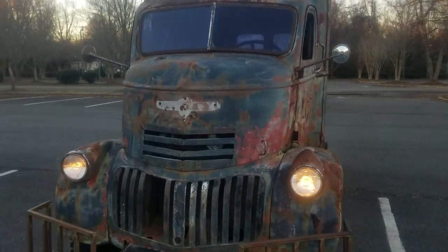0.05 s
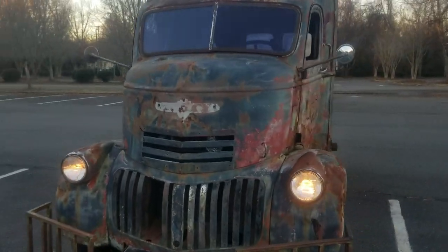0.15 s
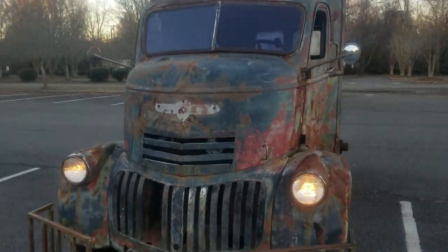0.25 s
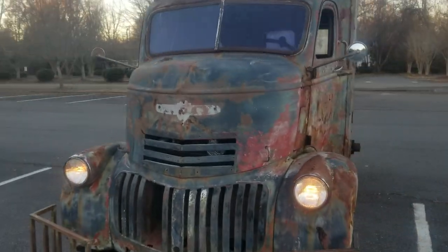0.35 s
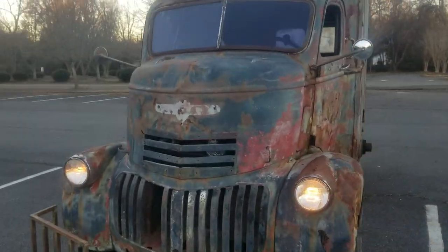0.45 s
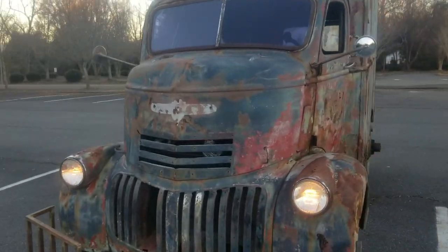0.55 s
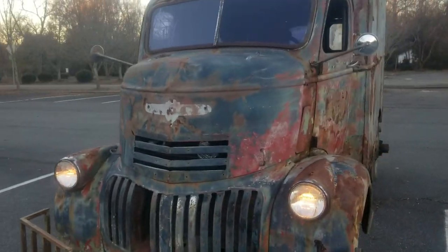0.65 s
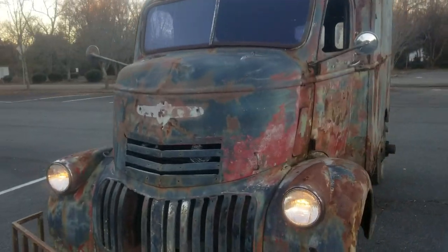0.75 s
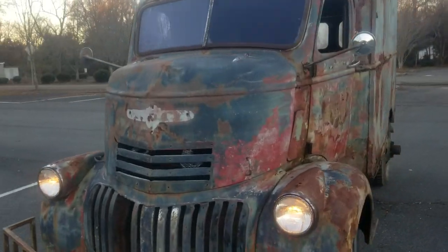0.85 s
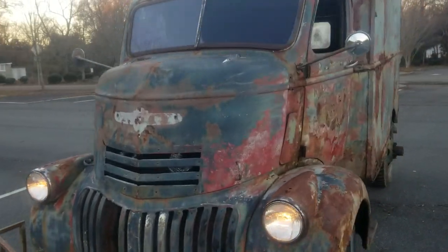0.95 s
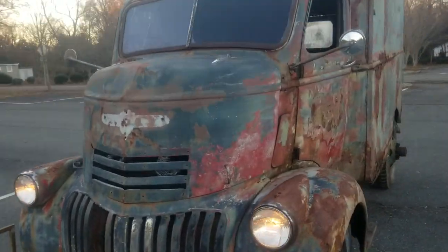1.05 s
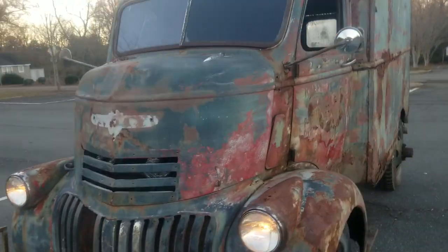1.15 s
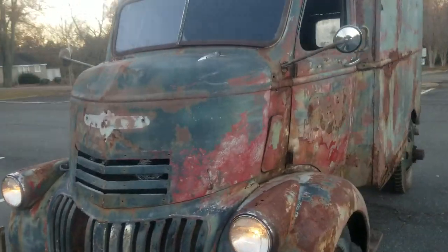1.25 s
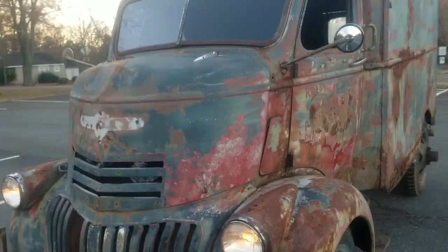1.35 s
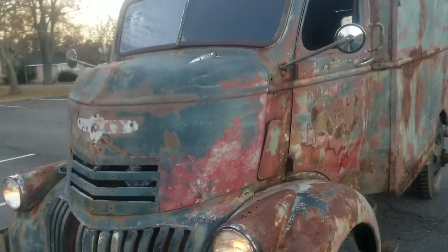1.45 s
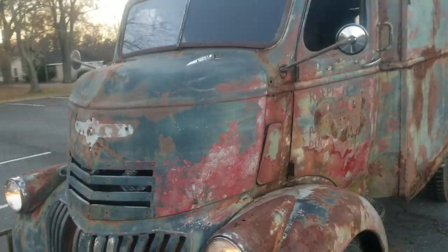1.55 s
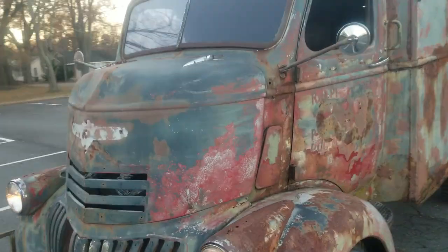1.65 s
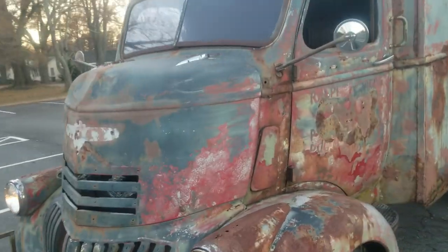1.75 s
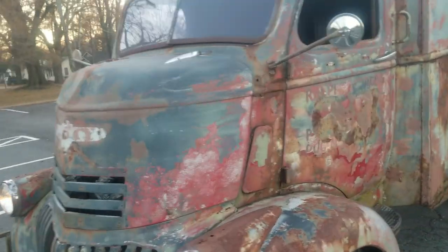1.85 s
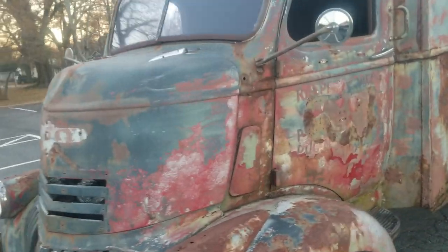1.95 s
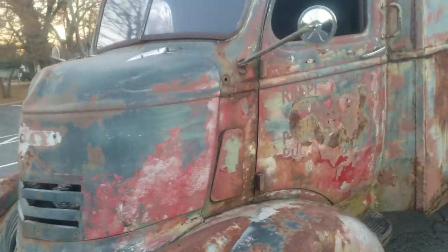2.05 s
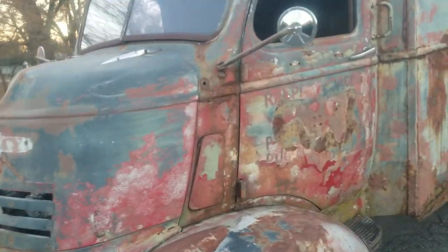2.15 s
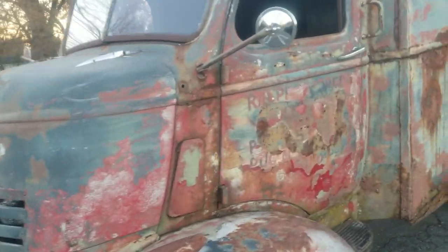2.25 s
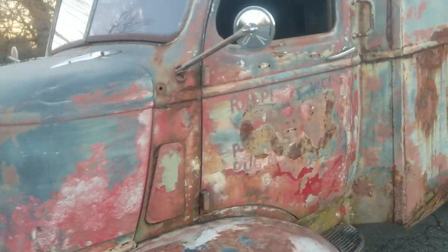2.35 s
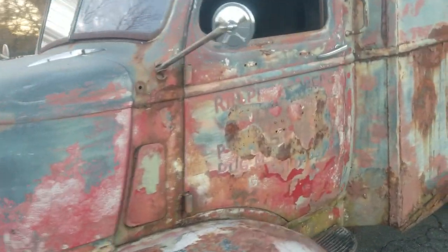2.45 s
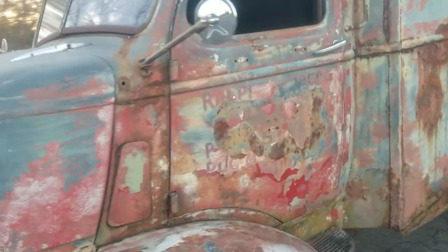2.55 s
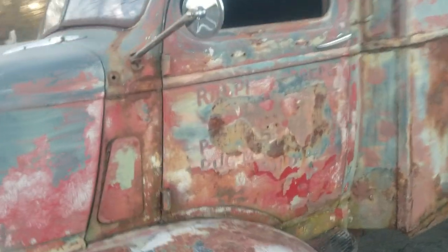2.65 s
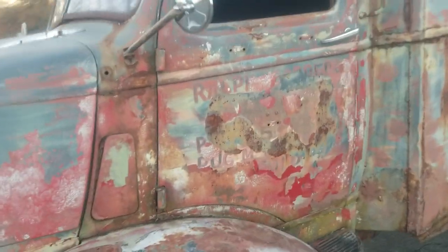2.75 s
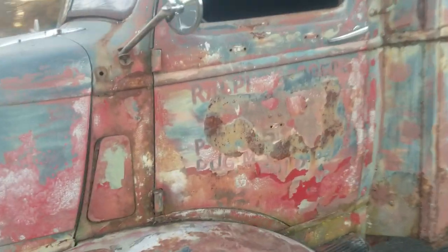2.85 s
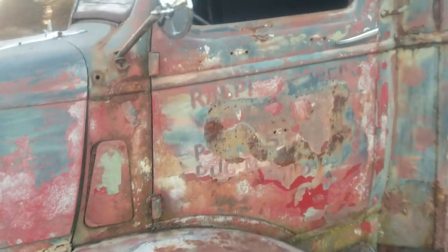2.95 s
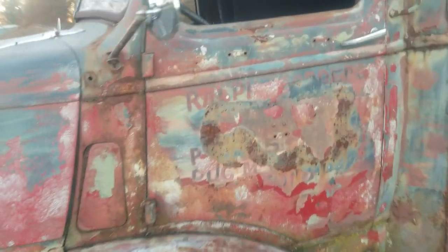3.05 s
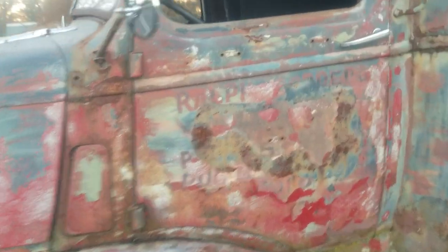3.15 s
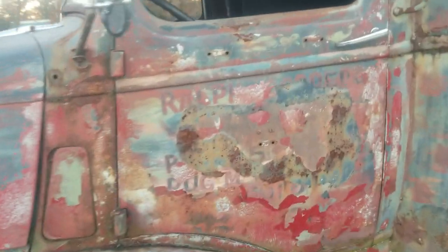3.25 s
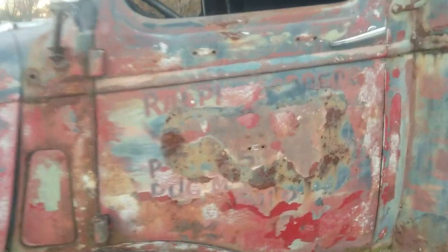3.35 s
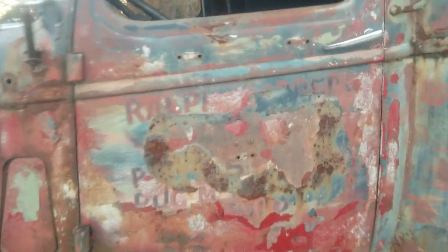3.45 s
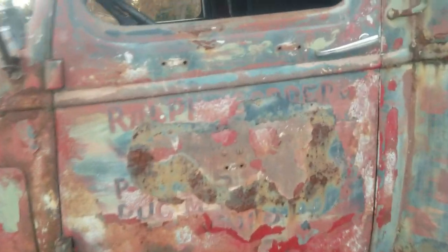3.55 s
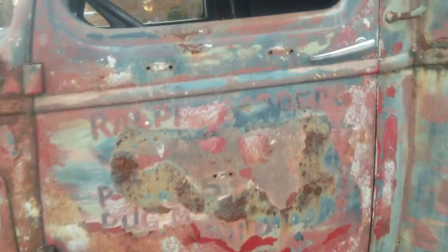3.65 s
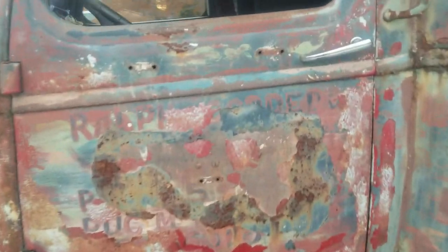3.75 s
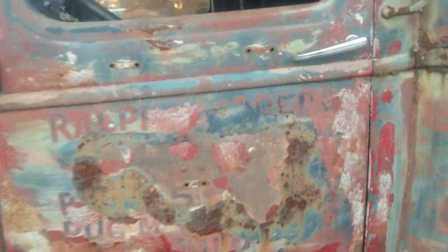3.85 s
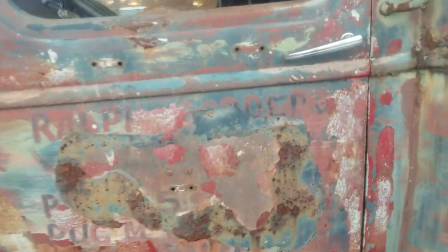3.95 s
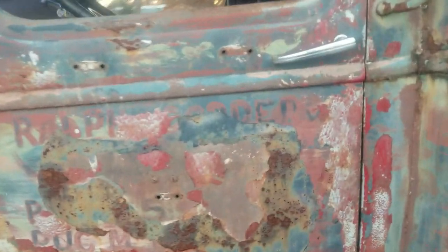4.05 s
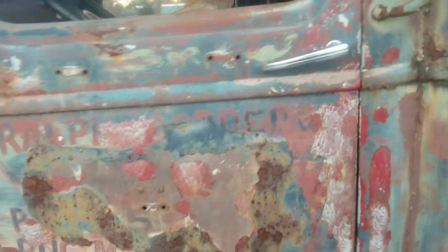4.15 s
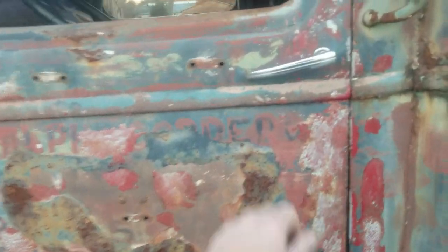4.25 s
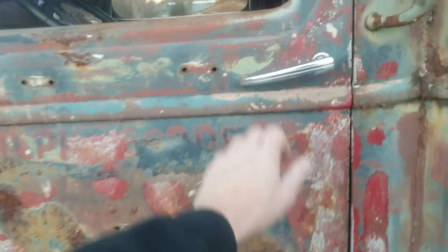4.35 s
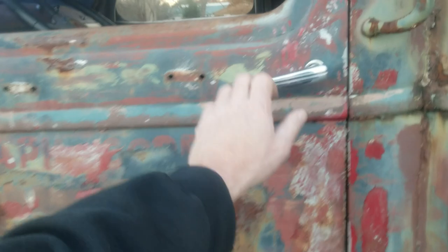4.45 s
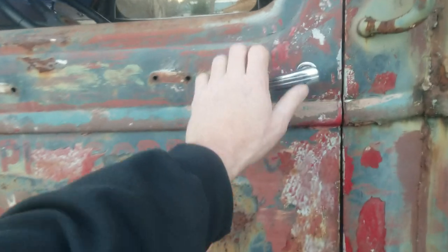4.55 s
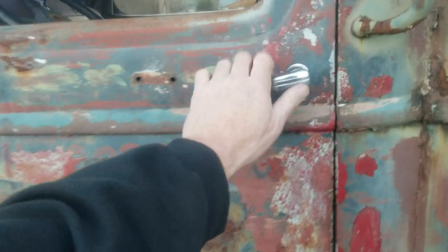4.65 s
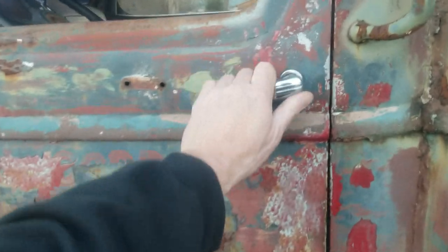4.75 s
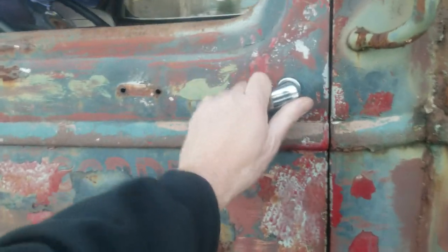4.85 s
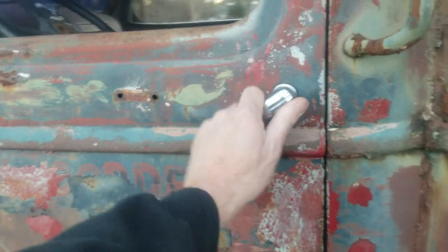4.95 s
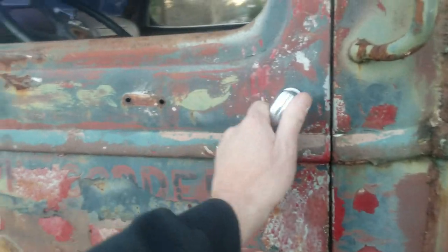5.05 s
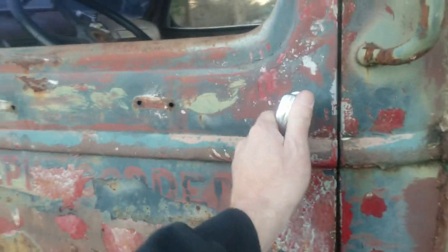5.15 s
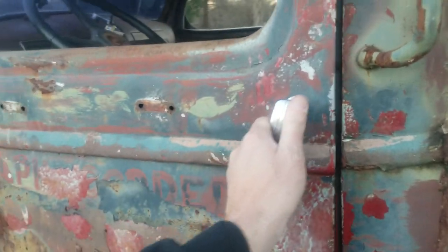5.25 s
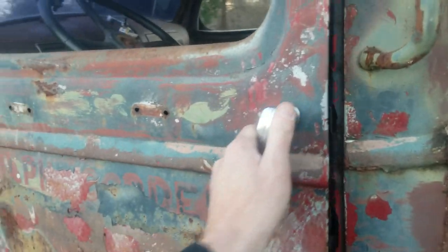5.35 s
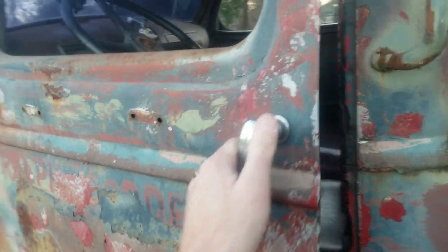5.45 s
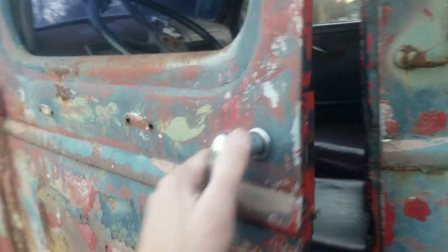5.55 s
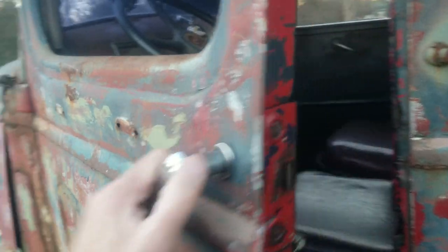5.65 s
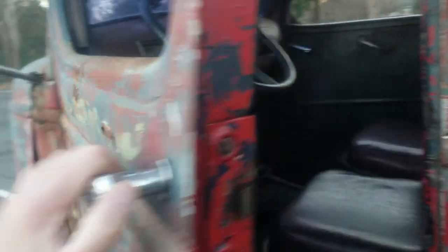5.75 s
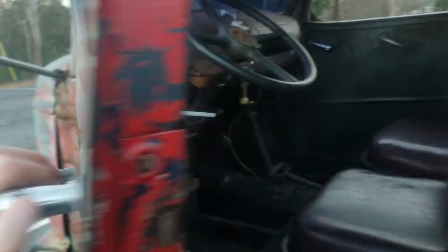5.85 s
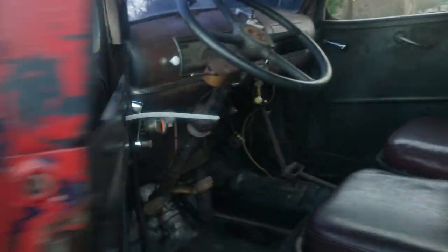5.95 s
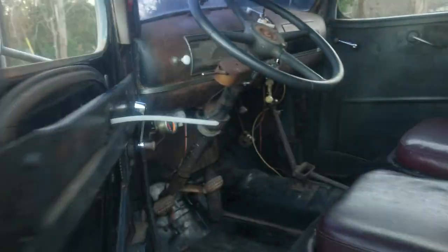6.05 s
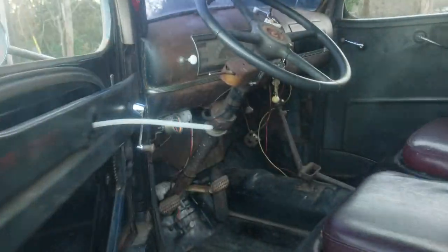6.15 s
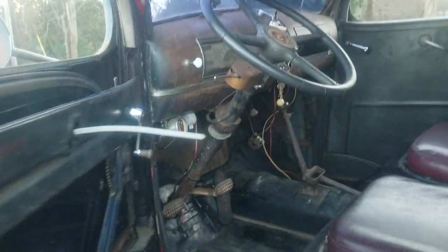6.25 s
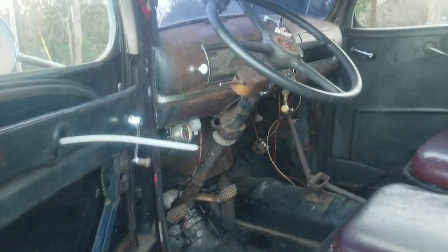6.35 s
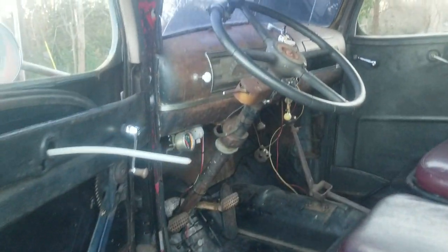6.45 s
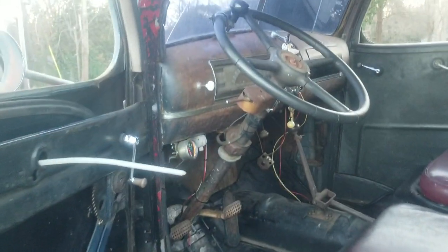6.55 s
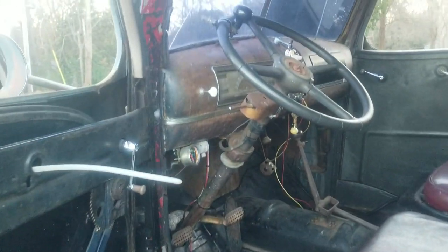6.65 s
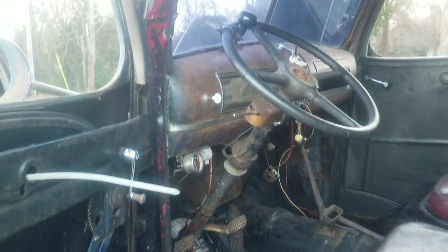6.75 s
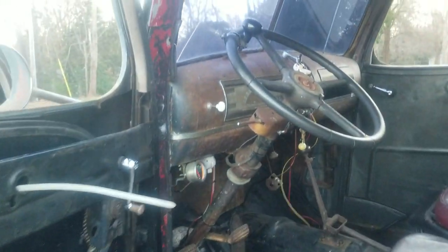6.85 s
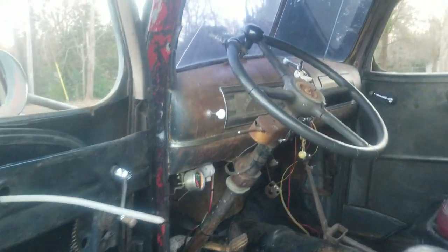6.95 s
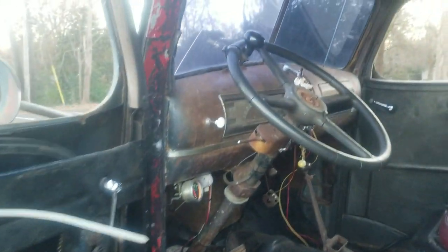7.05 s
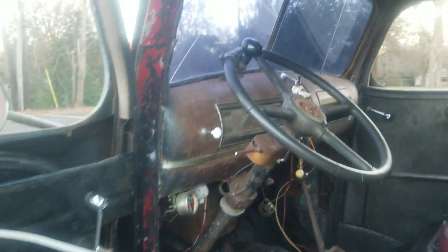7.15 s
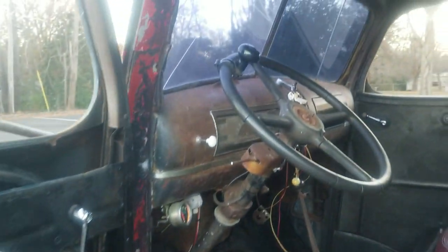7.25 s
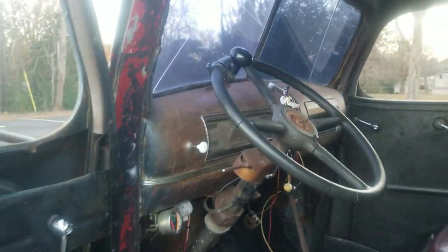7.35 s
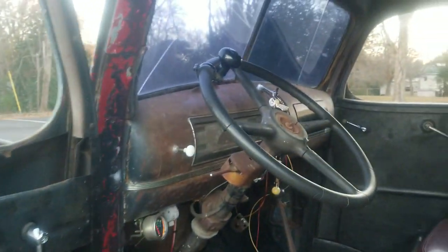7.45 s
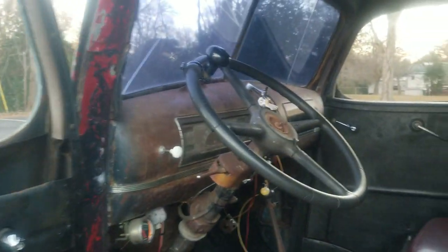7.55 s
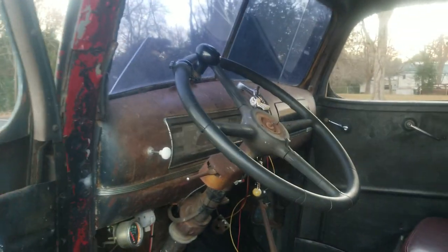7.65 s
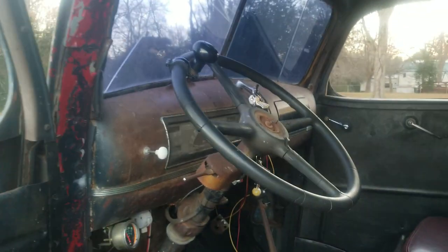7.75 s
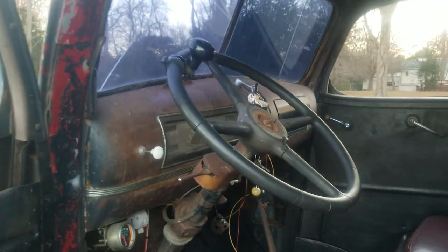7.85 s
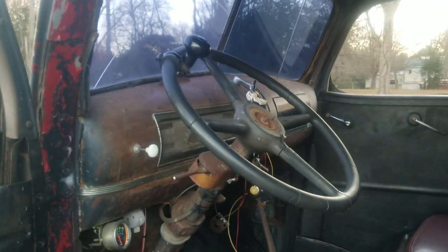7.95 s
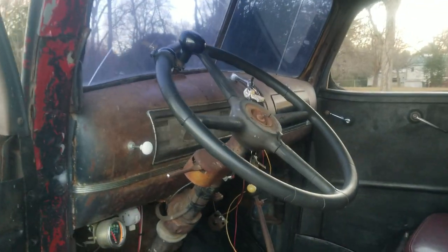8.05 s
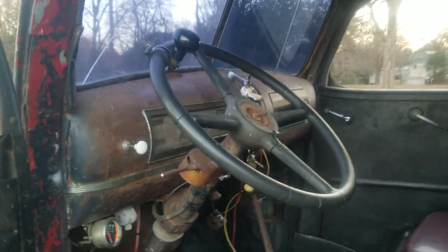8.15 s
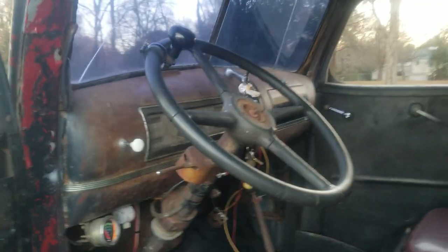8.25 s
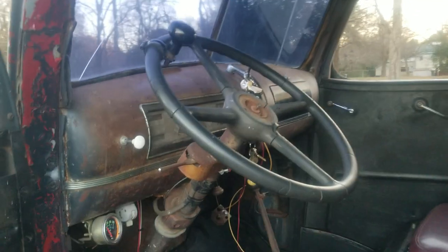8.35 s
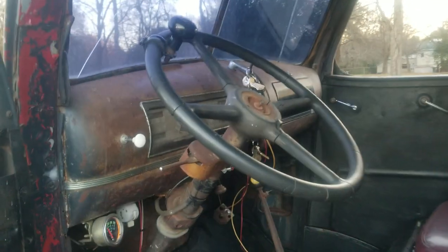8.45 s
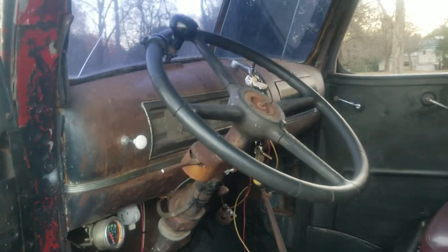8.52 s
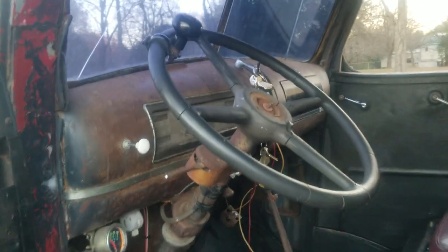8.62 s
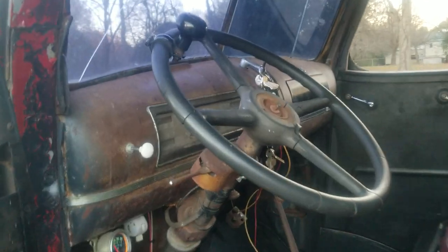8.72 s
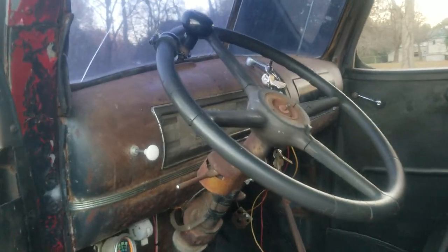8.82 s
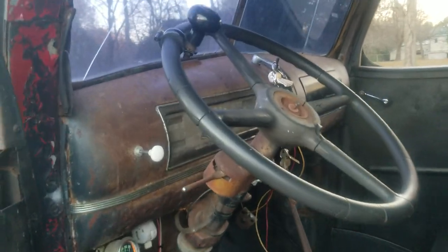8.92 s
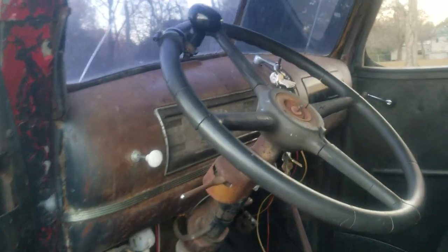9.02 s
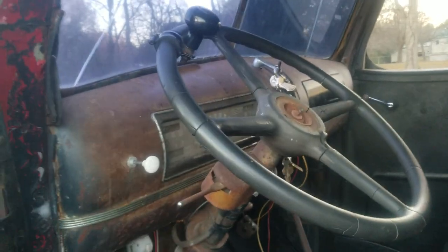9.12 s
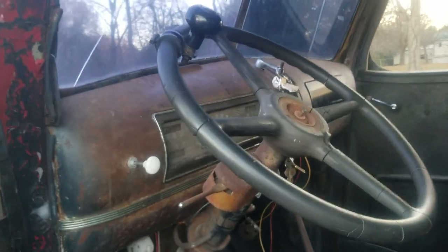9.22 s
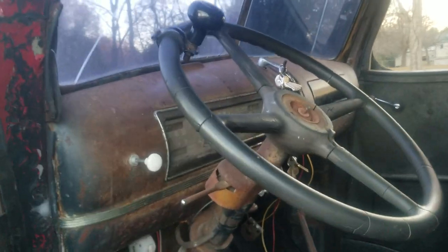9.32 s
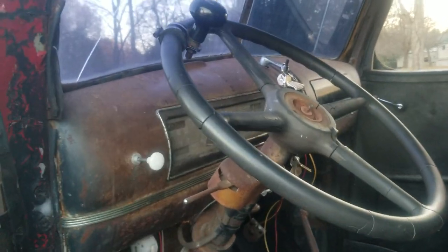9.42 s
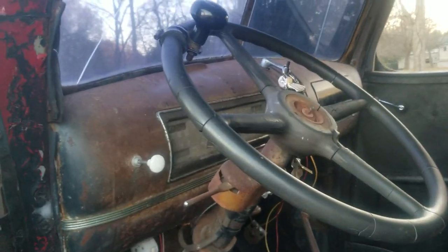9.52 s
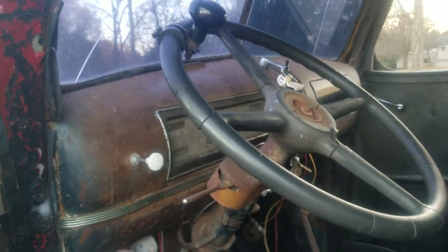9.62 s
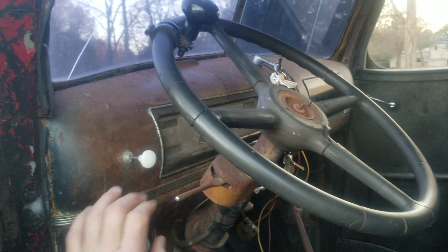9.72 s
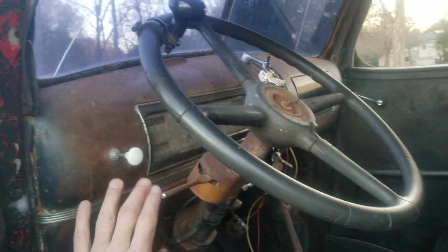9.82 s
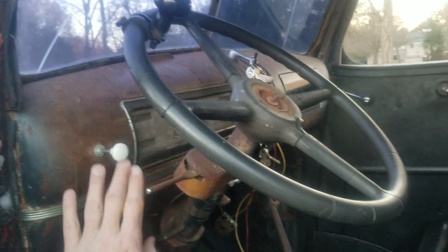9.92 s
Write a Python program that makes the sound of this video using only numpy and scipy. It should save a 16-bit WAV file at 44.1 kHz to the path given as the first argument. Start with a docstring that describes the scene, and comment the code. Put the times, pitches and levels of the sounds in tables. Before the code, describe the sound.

An old truck's handle clacks and squeaks, the steel door unlatches and swings open, over jacket swishes and a nearby engine.

```python
"""A nylon jacket swishes and shoes touch gritty asphalt in an open car park, over a traffic rumble and an
engine that pulls through two gears, then coasts. The handle of an old truck clacks and squeaks by
stick-slip friction, the latch grinds and lets go, and the steel door booms free and swings open. Loose
fittings clack, and gritty knocks follow as someone leans into the cab. Each impact is a burst of dense
ringing together with the damped normal modes of the struck body."""
import sys
import numpy as np
from scipy import signal
from scipy.fft import rfft, irfft, next_fast_len
from scipy.io import wavfile
from scipy.ndimage import uniform_filter1d

SR = 44100
rng = np.random.default_rng(int(sys.argv[2]) if len(sys.argv) > 2 else 0)


def materialize(psi):
    """Save the field psi as 16-bit PCM at rate SR to the path in sys.argv[1].

    A 1-D psi becomes a single channel; in a 2-D psi each row is a channel.
    """
    bounded = np.clip(np.atleast_2d(psi).T, -1, 1)
    quanta = np.round(bounded * 32767).astype(np.int16)
    wavfile.write(sys.argv[1], SR, quanta)


N = 440118

# Impacts: start_s, strength_db, thud_db, tick_db (the last two relative to the strength)
DOOR_BLOWS = [(4.9338, -19, -5.5, -23), (4.9408, -33, -1, -12.5), (4.961, -34.5, 9, -16),
              (5.118, -30, 0, -17), (5.1233, -41, 11, 3.5), (5.784, -24.5, -9, -19)]
LATCH_BLOWS = [(5.2514, -24, 9, -24), (5.2684, -21, 3.5, -19), (5.2823, -22.5, -6, -23),
               (5.3167, -29.5, -21, -27), (5.3555, -33.5, -1, -27)]
CAB_KNOCKS = [(8.9425, -37.5, -0.5, -16), (9.0157, -22.5, -15.5, -2.5), (9.0854, -35.5, 0, -27),
              (9.3775, -29.5, -36, -2), (9.7394, -27.5, -7.5, -29)]
STEPS = [(.805, -47, -10, -10), (2.5205, -48.5, 23, -10), (2.592, -59, 16, -13), (3.093, -63, 8, -1)]
# Impacts on small parts: start_s, strength_db, thud_db, tick_db, ring_on_db
HANDLE_BLOWS = [(4.389, -32.5, -15, -21, 22), (4.4256, -19.5, -20, -26, -31), (4.4334, -21, -16, -16, -28),
                (5.0605, -26.5, -10, -25, 4), (5.066, -28.5, -11, -27, 8)]
FITTING_BLOWS = [(6.647, -45, -15, -8, -16), (8.561, -53, -2, -19, -4), (8.592, -54, 8, -10, -11),
                 (8.6185, -32.5, -4, -19, -8), (8.6418, -44.5, 3, -15, -9), (8.692, -46, -1, -17, -15),
                 (8.7575, -55, -1, -15, -6)]
STOP_BLOWS = [(7.9188, -18, -15, -20, -2)]
# Normal modes of each struck body: pitch_hz, level_db, t60_s
DOOR_MODES = [(78.4, -18, 0.27), (115.3, -1, 0.7), (156, 8.5, 0.31), (207.4, -2, 0.57), (276.5, -5, 0.45),
              (353, -6, 0.45), (725, 7, 0.25), (830, 1, 0.2), (1119, 5, 0.33), (1152, 1, 0.2),
              (1390, -2, 0.17), (1575, 1, 0.19), (1803, 2, 0.12), (1945, 2, 0.1), (2444, 1, .14),
              (2546, -1, 0.17), (3060, -2, 0.12), (3400, 0.5, 0.13), (3660, 5, 0.11), (4050, 1, 0.066),
              (4720, 3, 0.09), (7600, -5, .1), (7930, -4, .06)]
HANDLE_MODES = [(134, 0, 0.2), (538, -5, 0.08), (720, -3, 0.06), (915, -3, 0.06), (1114, -7, 0.06),
                (1448, 5, 0.06), (1550, 2, 0.08), (1753, 0, 0.05), (2450, -3, 0.06), (2800, 8, 0.094),
                (3030, -1, 0.12), (3250, 2, 0.08), (3620, 4, 0.09), (3900, 5, 0.09), (4480, 0, 0.08),
                (6120, 2, 0.043), (7600, -5, 0.06)]
LATCH_MODES = [(77.7, 5, 0.16), (121, 2, 0.1), (167.8, 3.5, 0.36), (368, -11, 0.25), (780, -9, 0.085),
               (1174, -11.5, 0.12), (1600, -0.5, 0.13), (2295, -20, 0.22), (2730, -5, 0.078),
               (3490, 3, 0.025), (3620, 0, 0.04), (3730, -6, .04), (8100, -20, 0.044), (13500, 0, .03)]
STOP_MODES = [(1690, 8, 0.041), (1950, -1, .05), (2330, -6, .05), (2680, 5, 0.048), (2880, 0, .05),
              (2907, 8, 0.049), (3881, -3, .069), (7700, -2, 0.025)]
FITTING_MODES = [(144, 6, 0.13), (610, -9, 0.055), (1190, 7, 0.1), (1434, 7, 0.1), (1650, 2.5, 0.08),
                 (2460, -4, 0.1), (2810, 1, 0.06), (3200, -5.5, 0.055), (4400, -1, .12), (6100, -3, 0.064),
                 (8200, -4, 0.071)]
CAB_MODES = [(138, 3, 0.25), (335, -2, 0.41), (641, 11.5, 0.34), (685, 8, 0.3), (821, 9, 0.28),
             (890, 8, .25), (1177, 9, 0.17), (1234, 4.5, 0.23), (2000, 1, 0.12), (2200, 1.5, 0.28),
             (2401, 1, .16), (2679, 5, 0.14), (3320, -6, 0.14), (5114, 9, 0.14), (7120, 12, 0.1),
             (7700, 5, 0.21), (12500, 11, 0.086), (15000, 9, .04)]
# Bands of an impact, a row each for clash, thud, panel, clank and tick:
# low_hz, high_hz, crack_t60_s, tail_db, tail_t60_s, modes_db, gain_db
IMPACT_BANDS = [(1760, 3850, 0.13, -28, 0.83, -2, -5), (70.4, 370, 0.03, -15, 0.7, 2, -2),
                (620, 1206, 0.1, -1, 0.43, -6, -4), (1382, 1724, 0.056, -24.5, 0.44, 1, -3.5),
                (5000, 15700, 0.077, -28, 1, -8.5, 1.5)]
# Steel sliding on steel: start_s, end_s, end_db, swell_db, left_minus_right_db, panel_db
SCRAPES = [(4.387, 4.43, -24, 14, 3.5, 2), (4.908, 4.928, -26, 17, 3.5, 4.5), (4.972, 5.065, -46, 2, -1, 1),
           (5.095, 5.255, -45, 11, -1, 8), (5.56, 5.77, -47, 6, -0.5, 2), (5.776, 5.793, -27, 14, -5, 3),
           (6.24, 6.29, -56, 0, 0, 3), (6.646, 6.66, -51, -3, 0, -5), (6.714, 6.74, -51, 0, 0, -3),
           (7.85, 7.897, -42.5, 10.5, -1, -5), (7.904, 7.918, -23.5, 18, -1, -7),
           (7.935, 8.03, -53, -8, 0, 9), (8.58, 8.62, -47, 10, 1, 0), (9.006, 9.016, -47, -6, 15, 8),
           (9.658, 9.745, -42, 6, 1, 16)]
# Squeaks of the handle's dry spindle: start_s, length_s, pitch_hz, level_db
SQUEAKS = [(4.387, 0.047, 1543, -35), (5.059, 0.047, 1520, -29)]
# Partials of a squeak: multiple, level_db
SQUEAK_PARTIALS = [(1, -1), (1.93, -7), (2.9, -14)]
# Rust and grit crunching after knocks in the cab: start_s, level_db
CRUNCHES = [(8.945, -58), (9.025, -39), (9.38, -42), (9.745, -43)]

# Strokes of the jacket: start_s, length_s, level_db, tilt_db_per_octave, zip_db
SWISHES = [(.13, 0.46, -60.5, 0, 0), (.48, .21, -55.5, 0.5, -1), (.81, 0.12, -53, 0, 3),
           (.9, 0.34, -56.5, 0.5, 2.5), (1.2, 0.15, -59, 0.5, 3), (1.599, 0.38, -59.5, -0.5, 4),
           (1.95, .25, -53.5, 0, 2.5), (2.16, 0.47, -56, 1, -0.5), (3.02, 0.32, -65.5, -1, 3),
           (3.431, 0.49, -58, -0.5, 3), (3.839, 0.17, -53, 1, 0), (3.97, 0.15, -56, 0.5, 0),
           (4.08, .32, -60.5, 1.5, 3), (4.449, .25, -60, -1, -1), (4.769, .18, -55, -3.5, 1),
           (5.52, 0.32, -52, -0.5, -2), (6.2, 0.24, -57, -2, -1), (6.53, 0.37, -53.5, -0.3, -6),
           (7.309, 0.66, -55.5, 2, -10), (7.919, 0.45, -53.5, 1, -8)]
# Quick strokes that whistle: start_s, length_s, first_hz, middle_hz, last_hz, level_db, upper_fold_db
WHISTLES = [(1.61, 0.135, 6950, 7500, 6800, -71, -18), (1.63, 0.135, 7600, 8650, 7800, -69, -8),
            (1.775, .075, 6900, 8250, 7100, -66, -14), (1.761, 0.155, 7800, 8800, 6900, -72, -12),
            (1.978, .2, 7300, 11300, 7000, -69, -2), (2.2, 0.13, 7000, 9300, 9200, -74, -10),
            (7.32, .12, 8200, 8850, 8300, -75, -10), (7.372, .22, 9100, 9300, 8500, -77, -8),
            (7.49, 0.16, 9800, 10000, 9700, -69.5, -2), (7.639, .16, 13200, 14200, 13100, -70, -30),
            (8.0, 0.15, 9100, 10450, 10200, -67.5, -5), (8.16, 0.18, 10000, 9700, 7000, -69, -7)]
# Scuffs of the sleeve in the cab: start_s, length_s, level_db
SCUFFS = [(8.945, 0.33, -48.5), (9.04, 0.15, -49.5), (9.1, 1, -51), (9.28, 0.21, -50), (9.65, 0.27, -50.5)]

# Engine run, one table a gear: time_s, firing_hz, level_db
GEARS = [
    [(0, 53.7, -42.5), (.3, 56.18, -42.5), (1.45, 69.13, -48), (1.9, 76.95, -40.5), (2.25, 80.4, -41),
     (2.5, 80.8, -46), (3.05, 81.7, -51)],
    [(3.12, 54.6, -48.5), (3.27, 54.52, -37.5), (4.25, 59.1, -37), (4.7, 61.42, -41), (5.5, 67.1, -40.5),
     (6.25, 73.7, -37), (7.05, 77.28, -34.5), (7.35, 78.8, -41), (8.1, 78.84, -51.5), (9.3, 70.97, -47.5),
     (9.98, 69.86, -38.5)],
]
# Engine tones (exhaust orders, plus a faint gear whine at 6.72 times the firing rate): multiple, level_db
ENGINE_TONES = [(1, -23.5), (2, -1), (3, -27), (4, -16), (5, -21), (6, -28), (6.72, -28), (7, -24.5),
                (8, -36), (9, -32.5), (10, -36)]
# Overtones grow once the engine stops lugging: firing_hz, gain_db
OVERTONE_GAIN = [(58.5, -9), (62, 2.5), (78, -5)]
# Exhaust pipe resonance: centre_hz, half_width_hz, peak_db
PIPE_RESONANCE = [(709, 25, 12.5)]

# Spectra of the noisy sources: frequency_hz, level_db
STEEL_SPECTRUM = [(60, 5), (350, 3.5), (480, 6.5), (750, 5.5), (1000, 4.5), (1500, 3), (3700, 2), (5000, 1),
                  (6200, -10), (7600, -0.5), (9600, -14), (12500, -7), (16000, -14.5)]
SCRAPE_SPECTRUM = [(200, -16), (500, 0), (800, 4), (1050, -3), (1250, -1), (1500, 4), (1750, 5), (2100, -2),
                   (2900, 0.5), (3700, -6), (5500, -17), (8000, -22), (10000, -28), (16000, -28)]
NYLON_SPECTRUM = [(200, -18), (700, 11.5), (1400, 1), (2000, 8), (2500, -2.5), (3500, -1.5), (4800, 0),
                  (5800, -9), (7200, -3), (8400, -3), (9400, -24.5), (11000, -10.5), (13000, -17.5),
                  (15200, -11), (16000, -6.5)]
SLEEVE_SPECTRUM = [(150, -20), (330, 11), (470, 6.5), (650, 8.5), (900, 3), (1170, 3.5), (1600, 1),
                   (2100, 9.5), (2450, 2), (3700, -0.5), (4800, -2), (6200, -8.5), (7300, -3.5),
                   (10000, -16.5), (11300, -10), (12400, -8.5), (14000, -13), (15200, -8)]
TRAFFIC_SPECTRUM = [(15, -47), (25, -21.5), (60, -6.5), (161, -5), (217, -14), (242, -15.5), (373, -19),
                    (531, -31.5), (641, -25.5), (1290, -34.5), (1700, -41.5), (2000, -35.5), (2450, -51),
                    (3500, -53), (4030, -42.5), (5000, -45), (5700, -56.5), (7920, -53), (9500, -59),
                    (16000, -53)]
# Likeness of the left and right channels: frequency_hz, correlation
COHERENCE = [(60, 0.99), (130, 0.98), (290, 0.9), (640, 0.38), (1400, 0), (3000, 0), (15000, 0)]
# Balance of the traffic and of the microphone ports: frequency_hz, left_minus_right_db
TRAFFIC_SIDE = [(100, -1), (400, 2), (700, -2), (1800, 7), (3000, 8.5), (8000, 5), (14000, -1.5)]
PORT_SIDE = [(500, 0), (1000, 1.5), (1600, 3), (2400, .5), (4500, -4.5), (8000, -7), (11000, 1.5),
             (15000, 2)]


def door():
    """Impact excitation: the large, lightly damped steel door rings on after each blow."""
    return impacts(DOOR_BLOWS, DOOR_MODES, clash_db=3, panel_db=-2, clank_db=-2, boom_db=1.5, side_db=-1,
                   tail_db=2, modes_db=-2.5, sing_db=2.5, decay_scale=.91, rise_s=.0004)


def door_skin(start_s=5.245, start_hz=112, free_hz=160, free_s=.022, level_db=-14.5, swell_s=.011):
    """Plate vibration: the skin booms as the door pops from its frame, rising in pitch as it frees."""
    t = np.maximum(np.arange(N) / SR - start_s, 0)
    hz = free_hz + (start_hz - free_hz) * np.exp(-t / free_s)
    envelope = t / swell_s * np.exp(1 - t / swell_s)
    return amp(level_db) * envelope * np.sin(phase(hz * (t > 0)))


def handle():
    """Impact on a small body: the handle's well-damped modes give a dry clack."""
    return impacts(HANDLE_BLOWS, HANDLE_MODES, clash_db=-3, panel_db=-12, clank_db=1, boom_db=3,
                   side_db=1.5, tail_db=8, modes_db=-1.5, sing_db=2, decay_scale=.78, rise_s=.00053)


def latch():
    """Repeated impact: the latch rattles as it lets go."""
    return impacts(LATCH_BLOWS, LATCH_MODES, clash_db=0, panel_db=-11, clank_db=-14, boom_db=-1,
                   side_db=1.5, tail_db=5, modes_db=2, sing_db=2, decay_scale=.68, rise_s=.00025)


def door_stop():
    """Heavy damping: the open door bumps its stop, whose high modes die quickly."""
    return impacts(STOP_BLOWS, STOP_MODES, clash_db=0, panel_db=-21, clank_db=-3, boom_db=2,
                   side_db=2, tail_db=6.5, modes_db=5.5, sing_db=0, decay_scale=.55, rise_s=.00048)


def fittings():
    """Free vibration: loose fittings ring briefly after each contact."""
    return impacts(FITTING_BLOWS, FITTING_MODES, clash_db=-3, panel_db=-14, clank_db=-1, boom_db=-1.5,
                   side_db=1.5, tail_db=5, modes_db=2, sing_db=-3, decay_scale=1, rise_s=.00039)


def cab():
    """Resonance: the cab's slowly decaying modes prolong each knock."""
    return impacts(CAB_KNOCKS, CAB_MODES, clash_db=-1, panel_db=-2, clank_db=-10, boom_db=2.5,
                   side_db=1.5, tail_db=-2, modes_db=-3.5, sing_db=-4, decay_scale=.93, rise_s=.00059)


def impacts(rows, body, clash_db, panel_db, clank_db, boom_db, side_db, tail_db, modes_db, sing_db,
            decay_scale, rise_s, chatter_db=2.5, chatter_hz=262, snap_db=-1, snap_t60_s=.011):
    """Impulse response: in each band a blow gives a snap, a dense crack, a tail and clear modes."""
    out, t = np.zeros((2, N)), np.arange(SR // 2) / SR
    spectrum = ringing_spectrum(body, sing_db)
    for start_s, strength_db, thud_db, tick_db, *ring_on in rows:
        dense = noise(len(t), spectrum)
        dense *= amp(chatter_db * drift(len(t), chatter_hz) * np.exp(-t / .071))  # loose steel chatters
        modes = normal_modes(body, t)
        ring_db = sum(ring_on)  # 0 where the column is absent
        balance_db = (clash_db, thud_db + boom_db, panel_db, clank_db, tick_db)
        for band_db, band in zip(balance_db, IMPACT_BANDS):
            low_hz, high_hz, crack_t60_s, late_db, late_t60_s, clear_db, gain_db = band
            bandpass = signal.butter(3, [low_hz, high_hz], "band", fs=SR, output="sos")
            onset = 1 - np.exp(-t / (rise_s + .5 / high_hz))  # big panels take longer to get moving
            snap = amp(snap_db - 60 * t / snap_t60_s)
            crack = amp(-60 * t / (crack_t60_s * decay_scale))
            tail = amp(late_db + tail_db + ring_db - 60 * t / late_t60_s)
            burst = unit_peak(signal.sosfilt(bandpass, dense * (snap + crack + tail) * onset))
            clear = unit_peak(signal.sosfilt(bandpass, modes * onset))
            sound = unit_peak(burst + amp(clear_db + modes_db + ring_db / 2) * clear)
            sides = pan(side_db * min(low_hz / 1000, 1))  # bass stays near the centre
            add(out, start_s - .001, amp(strength_db + band_db + gain_db) * sides * sound)
    return out


def normal_modes(body, t, spot_db=2.5):
    """Superposition of damped modes, each stronger or weaker with the spot that is struck."""
    hz, db, t60_s = np.transpose(body)
    left, apart = rng.uniform(-np.pi, np.pi, (2, len(hz)))
    phases = np.array([left, left + apart * (1 - read(COHERENCE, hz))])
    strengths = amp(db + spot_db * rng.standard_normal(len(hz)))
    ringing = np.exp(np.outer(2j * np.pi * hz - np.log(1000) / t60_s, t))
    return ((strengths * np.exp(1j * phases)) @ ringing).real


def ringing_spectrum(body, sing_db, relative_width=.012):
    """Resonance peaks lift the dense ringing of steel around the modes of one body."""
    hz = np.geomspace(50, 17000, 1200)
    peaks = sum(amp(db + sing_db) ** 2 * resonance(hz, mode_hz, relative_width * mode_hz)
                for mode_hz, db, _ in body)
    return np.transpose([hz, read(STEEL_SPECTRUM, hz) + 10 * np.log10(1 + peaks)])


def hinge(peak_s=5.879, pitch_hz=5570, level_db=-56, swell_s=.013):
    """Friction-driven vibration: the dry hinge gives one thin squeak as the door slows."""
    envelope = np.exp(-abs(np.arange(N) / SR - peak_s) / swell_s)
    angle = phase(pitch_hz * (1 + .0016 * drift(N, 60)))
    return amp(level_db) * envelope * np.sin(angle + np.array([[0], [1]]))


def spindle_squeaks(bend=.045, roughness=.055, roughness_hz=350, flutter_db=3):
    """Stick-slip oscillation: the handle's spindle gives a short, rough note that rises and sags."""
    out = np.zeros((2, N))
    for start_s, length_s, pitch_hz, db in SQUEAKS:
        n = round(length_s * SR)
        arch = np.sin(np.pi * (np.arange(n) / n) ** .6)
        angle = phase(pitch_hz * (1 + bend * (arch - 1) + roughness * drift(n, roughness_hz)))
        for multiple, partial_db in SQUEAK_PARTIALS:
            level = amp(db + partial_db + flutter_db * drift(n, 200)) * arch
            add(out, start_s, level * np.sin(multiple * angle + rng.uniform(0, np.pi, (2, 1))))
    return out


def scrapes(slips_per_s=260, steady_friction=.89, slip_s=.00062, release_s=.04):
    """Irregular stick-slip: sliding steel chatters in a run of tiny uneven blows."""
    out = np.zeros((2, N))
    for start_s, end_s, end_db, swell_db, side_db, panel_db in SCRAPES:
        spectrum = [(hz, db + panel_db * (hz < 1400)) for hz, db in SCRAPE_SPECTRUM]
        length_s = end_s - start_s
        t = np.arange(round((length_s + release_s) * SR)) / SR
        slips = (rng.random(len(t)) < slips_per_s / SR) * rng.uniform(.13, 1.15, len(t))
        chatter = steady_friction + relax(slips, slip_s)
        level_db = np.interp(t, [0, length_s, t[-1]], [end_db - swell_db, end_db, end_db - 41])
        add(out, start_s, unit(noise(len(t), spectrum) * chatter) * amp(level_db) * pan(side_db))
    return out


def grit(grains_per_s=420, spread_db=5, grain_s=.0005, t60_s=.25, band_hz=(750, 5400)):
    """Brittle fracture: separate grains crack under the weight, fading as it settles."""
    out, t = np.zeros((2, N)), np.arange(SR // 2) / SR
    bandpass = signal.butter(3, band_hz, "band", fs=SR, output="sos")
    for start_s, db in CRUNCHES:
        cracks = rng.random(len(t)) < grains_per_s / SR
        sizes = amp(spread_db * np.minimum(rng.exponential(1, len(t)), 3))
        bursts = relax(cracks * sizes, grain_s) * rng.standard_normal((2, len(t)))
        add(out, start_s, amp(db - 60 * t / t60_s) * unit(signal.sosfilt(bandpass, bursts)))
    return out


def footsteps():
    """Non-resonant impact: shoes on gritty asphalt thud and tick, with the modes suppressed."""
    return impacts(STEPS, CAB_MODES, clash_db=-1, panel_db=-2, clank_db=-6, boom_db=-4, side_db=-2,
                   tail_db=-10.5, modes_db=-46, sing_db=-20, decay_scale=.67, rise_s=.0003)


def jacket_swishes(grain_db=.95, grain_hz=45, zip_hz=7600, zip_octaves=.28, split_hz=3000):
    """Friction noise: nylon swells and brightens with speed, and its treble flickers as folds catch."""
    out, hz = np.zeros((2, N)), np.geomspace(100, 17000, 200)
    lowpass = signal.butter(2, split_hz, fs=SR, output="sos")
    zip_peak = np.exp(-(np.log2(hz / zip_hz) / zip_octaves) ** 2)
    for start_s, length_s, db, tilt_db, zip_db in SWISHES:
        n = round(length_s * SR)
        speed = stroke(np.arange(n) / n, peak_share=.49)
        colour_db = read(NYLON_SPECTRUM, hz) + tilt_db * np.log2(hz / split_hz) + zip_db * zip_peak
        rub = noise(n, np.transpose([hz, colour_db]))
        body = signal.sosfiltfilt(lowpass, rub)
        treble = (rub - body) * speed ** .2 * amp(1.3 * drift(n, 18))
        add(out, start_s, amp(db + grain_db * drift(n, grain_hz)) * speed ** .54 * (body + treble))
    return out


def weave_whistles(wander=.012, fuzz=.017, flicker_db=5, upper_fold_ratio=1.33):
    """Periodic contact: ribs of the weave zip over each other at a pitch that follows stroke speed."""
    out = np.zeros((2, N))
    for start_s, length_s, first_hz, middle_hz, last_hz, db, upper_db in WHISTLES:
        n = round(length_s * SR)
        arch = np.sin(np.pi * np.arange(n) / n) ** .75
        glide_hz = np.linspace(first_hz, last_hz, n) + (middle_hz - (first_hz + last_hz) / 2) * arch
        for ratio, fold_db in ((1, 0), (upper_fold_ratio, upper_db)):  # a second fold slides faster
            hz = glide_hz * ratio * (1 + wander * drift(n, 25) + fuzz * drift(n, 600))
            angle = phase(hz) + rng.uniform(0, np.pi / 2, (2, 1))
            level = amp(db + fold_db + flicker_db * drift(n, 40)) * np.sqrt(arch)
            add(out, start_s, level * np.sin(angle))
    return out


def sleeve_scuffs(grain_db=1.5, grain_hz=90):
    """Incoherent addition: the sleeve rubs in uneven clumps, and overlapping scuffs sum in power."""
    t, power = np.arange(N) / SR, np.zeros(N)
    for start_s, length_s, db in SCUFFS:
        speed = stroke((t - start_s) / length_s, peak_share=.23)
        power += (amp(db) * speed ** .47) ** 2
    return np.sqrt(power) * unit(noise(N, SLEEVE_SPECTRUM) * amp(grain_db * drift(N, grain_hz)))


def engine(lifts_s=(2.26, 7.06), unload_s=.1, coast_db_per_s=6, waver=.0038, fade_db=2.5, fade_hz=6,
           drone_hz=536.6, drone_width_hz=31, drone_db=9, rasp=.47, rasp_hz=30):
    """Forced resonance: engine tones follow the firing rate and swell at pipe and silencer resonances."""
    out = np.zeros((2, N))
    for gear, lift_s in zip(GEARS, lifts_s):  # the throttle closes late in each gear
        times_s, *columns = np.transpose(gear)
        t = np.arange(times_s[0], times_s[-1], 1 / SR)
        n = len(t)
        firing_hz, db = (np.interp(t, times_s, column) for column in columns)
        overtones_db = read(OVERTONE_GAIN, firing_hz) - coast_db_per_s * np.maximum(t - lift_s, 0)
        load = np.clip(1 - (t - lift_s) / unload_s, 0, 1)
        angle = phase(firing_hz * (1 + waver * drift(n, 21)))
        for multiple, tone_db in ENGINE_TONES:
            hz = multiple * firing_hz
            pipe_db = sum(peak_db * resonance(hz, centre_hz, width_hz)
                          for centre_hz, width_hz, peak_db in PIPE_RESONANCE)
            drone = load * resonance(hz, drone_hz, drone_width_hz)  # the silencer drones under load
            level = amp(db + tone_db + pipe_db + drone_db * drone + overtones_db * (multiple > 2))
            level *= unit(amp(fade_db * drift(n, fade_hz)))  # fading in the open air
            level *= 1 + rasp * drone * drift(n, rasp_hz)
            scatter = rng.uniform(0, 2 * np.pi) + .39 * drift(n, 8.8)  # echoes shift the phase
            lead = np.array([[0], [.13 * multiple]])  # the sound arrives first on the right
            add(out, times_s[0], np.sqrt(2) * level * np.sin(multiple * angle + lead + scatter))
    return out


def traffic(level_db=-44, swell_db=.7, throb_db=.6, rumble_hz=300):
    """Amplitude-modulated noise: a low rumble throbs under the hiss of distant tyres and trees."""
    air = noise(N, TRAFFIC_SPECTRUM, TRAFFIC_SIDE)
    rumble = signal.sosfiltfilt(signal.butter(2, rumble_hz, fs=SR, output="sos"), air)
    hiss = air - rumble
    swell = amp(swell_db * drift(N, 2))
    throb = amp(-throb_db * drift(N, 8))
    return amp(level_db) * swell * (hiss + rumble * throb)


def noise(n, spectrum, side=None):
    """Partial coherence: coloured stereo noise of rms 1, alike in the bass, unrelated in the treble."""
    size = next_fast_len(n)
    hz = np.fft.rfftfreq(size, 1 / SR)
    left, independent = rfft(rng.standard_normal((2, size)))
    coherence = read(COHERENCE, hz)
    right = coherence * left + np.sqrt(1 - coherence ** 2) * independent
    coloured = np.array([left, right]) * amp(read(spectrum, hz))
    return unit(irfft(coloured * pan(read(side, hz) if side else 0), size)[:, :n])


def drift(n, rate_hz, step=16):
    """Random modulation: low-passed noise of rms near 1 that moves at about the given rate."""
    size = next_fast_len(max(n, SR) // step + 2)
    hz = np.fft.rfftfreq(size, step / SR)
    slow = unit(irfft(rfft(rng.standard_normal(size)) / (1 + (hz / rate_hz) ** 4), size))
    return np.interp(np.arange(n) / step, np.arange(size), slow)


def resonance(hz, centre_hz, half_width_hz):
    """Resonance curve with a peak of 1."""
    return 1 / (1 + ((hz - centre_hz) / half_width_hz) ** 2)


def relax(impulses, decay_s):
    """Exponential decay after each impulse."""
    return signal.lfilter([1], [1, -np.exp(-1 / (decay_s * SR))], impulses)


def stroke(progress, peak_share):
    """Speed of one movement: an arch from rest to rest."""
    return np.sin(np.pi / 2 * np.interp(progress, [0, peak_share, 1], [0, 1, 0]))


def phase(hz):
    """Phase in radians is the integral of frequency."""
    return 2 * np.pi * np.cumsum(hz) / SR


def amp(db):
    """Decibels to amplitude ratio."""
    return 10 ** (np.asarray(db) / 20)


def unit(x):
    """Normalises to rms 1."""
    return x / np.sqrt(np.mean(x ** 2) + 1e-20)


def unit_peak(x):
    """Normalises the loudest few milliseconds to rms 1."""
    return x / np.sqrt(uniform_filter1d((x ** 2).mean(0), 256).max() + 1e-20)


def read(points, hz):
    """Interpolates a curve along a log-frequency axis."""
    points_hz, values = np.transpose(points)
    return np.interp(np.log(hz + 1), np.log(points_hz + 1), values)


def pan(side_db):
    """Left and right gains for a level difference."""
    return amp(np.array([[.5], [-.5]]) * side_db)


def add(mix, start_s, sound):
    """Superposes a stereo sound on the mix."""
    part = mix[:, max(round(start_s * SR), 0):][:, :sound.shape[1]]
    part += sound[:, :part.shape[1]]


def scene():
    """Linear superposition: impacts, friction, clothing and background add as pressures."""
    hits = handle() + fittings() + door() + latch() + cab() + footsteps() + door_stop() + door_skin()
    friction = hinge() + spindle_squeaks() + scrapes() + grit()
    clothing = sleeve_scuffs() + jacket_swishes() + weave_whistles()
    return hits + friction + clothing + engine() + traffic()


def record(dry):
    """Frequency response: two microphone ports colour the sides differently; the band ends at 16 kHz."""
    heard = irfft(rfft(dry) * pan(read(PORT_SIDE, np.fft.rfftfreq(N, 1 / SR))), N)
    lowpass = signal.firwin(511, 16000, window=("kaiser", 9), fs=SR)
    return signal.oaconvolve(heard, lowpass[None], "same")


dry = scene()
out = record(dry)
materialize(out)
```